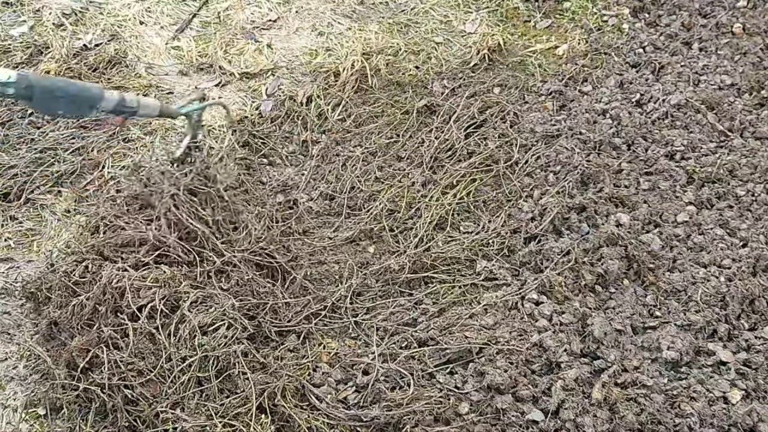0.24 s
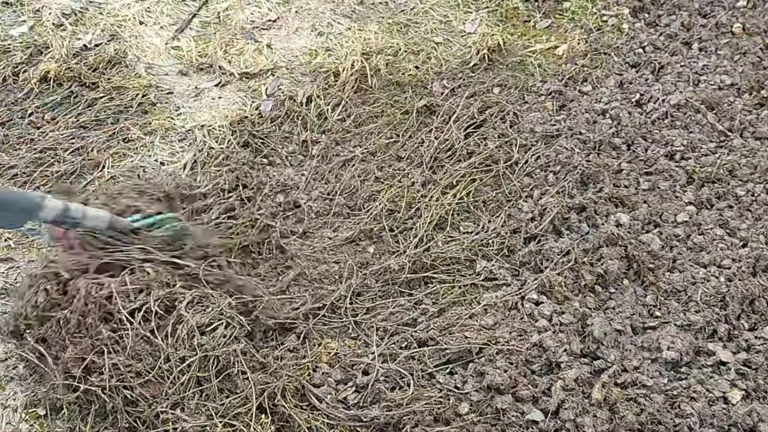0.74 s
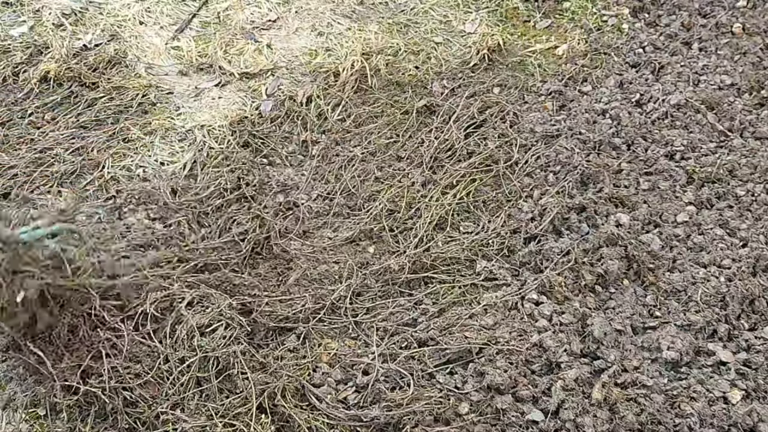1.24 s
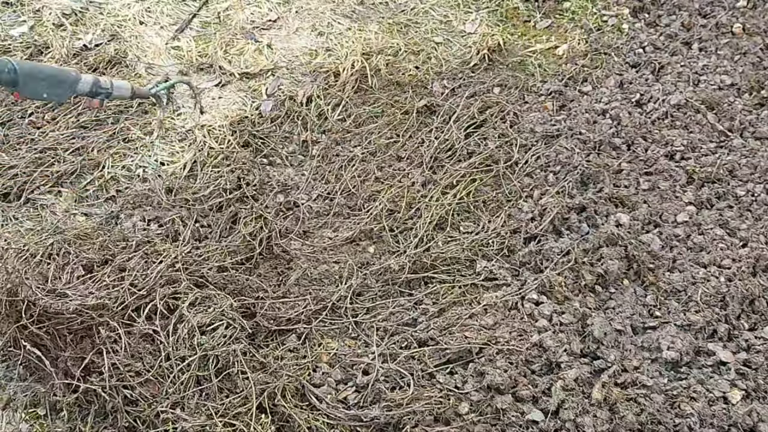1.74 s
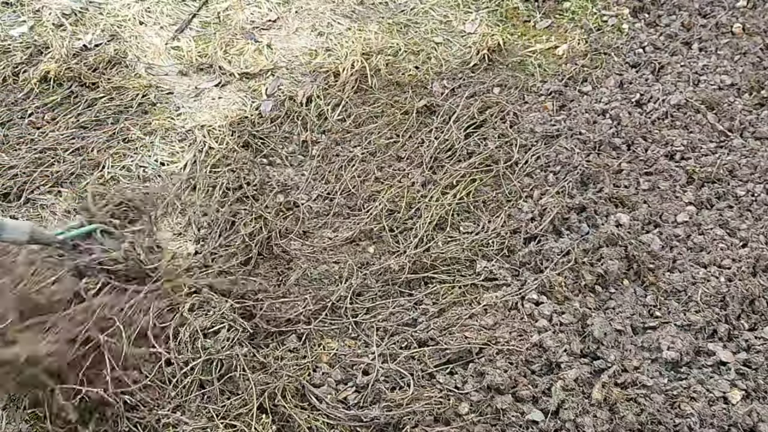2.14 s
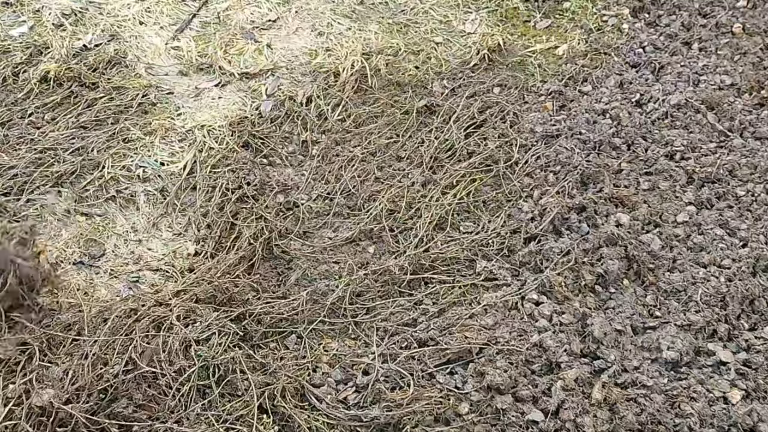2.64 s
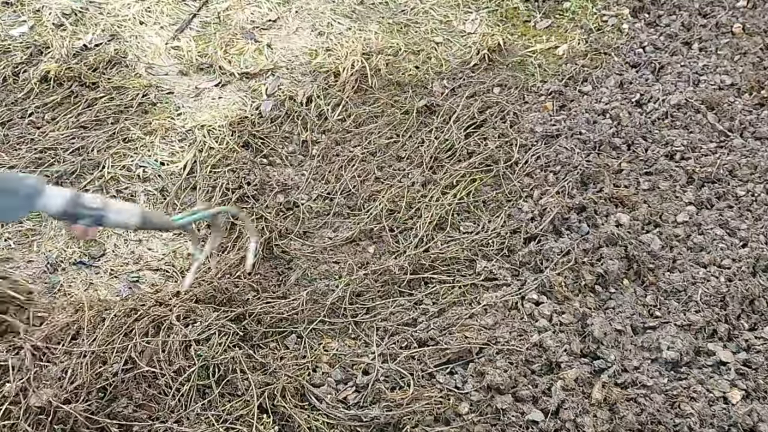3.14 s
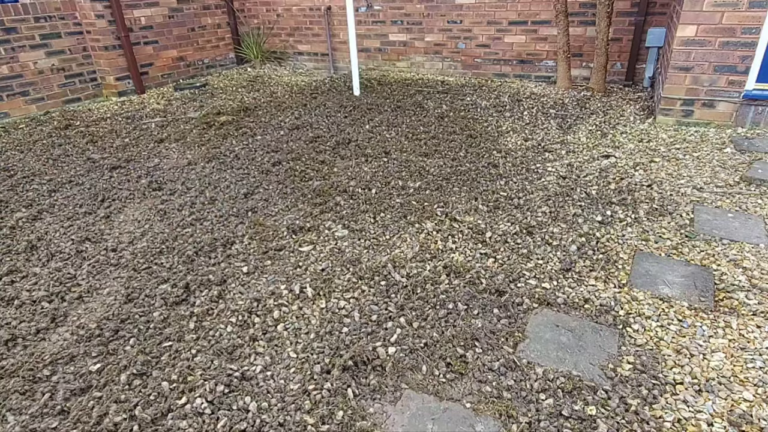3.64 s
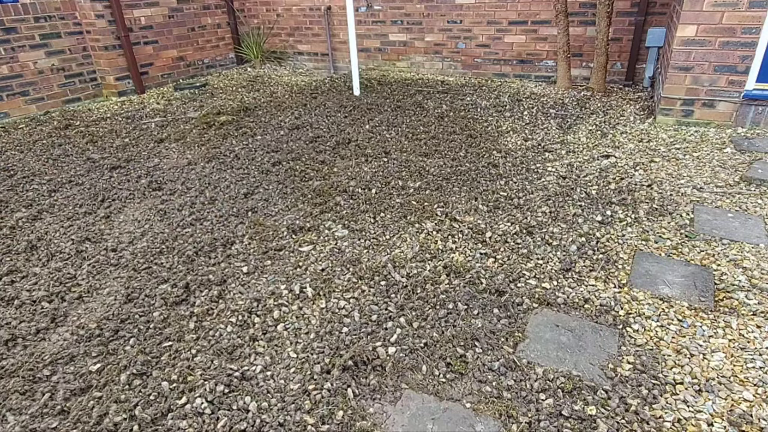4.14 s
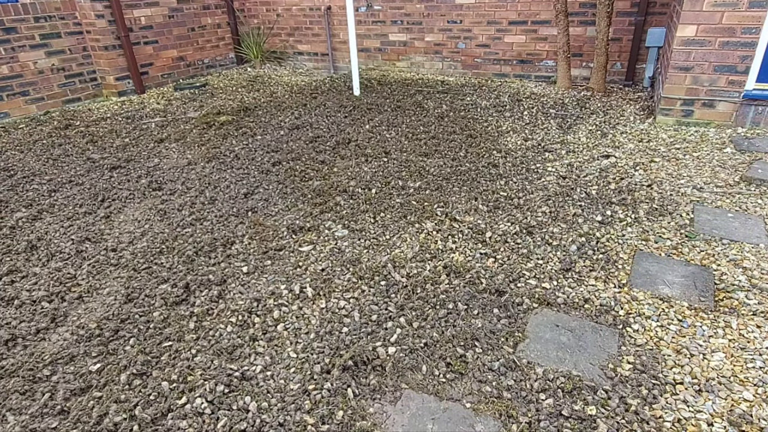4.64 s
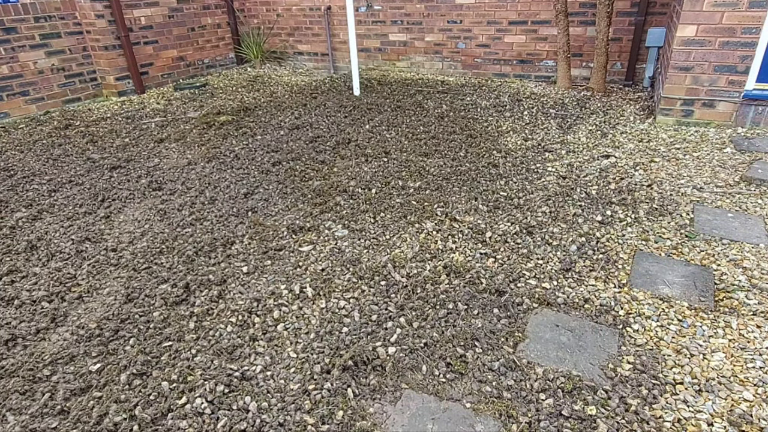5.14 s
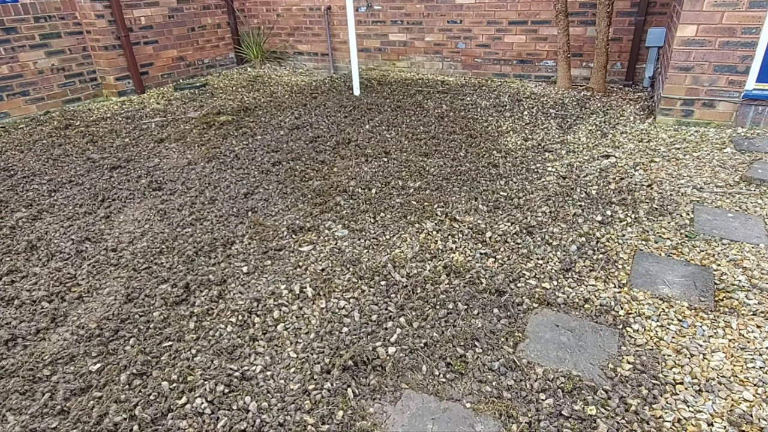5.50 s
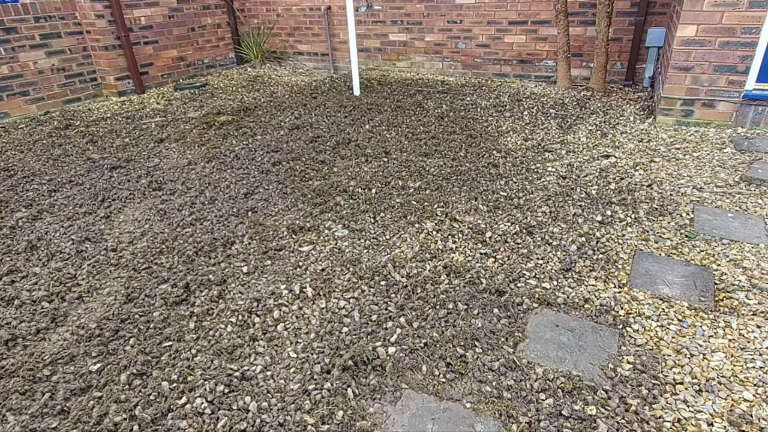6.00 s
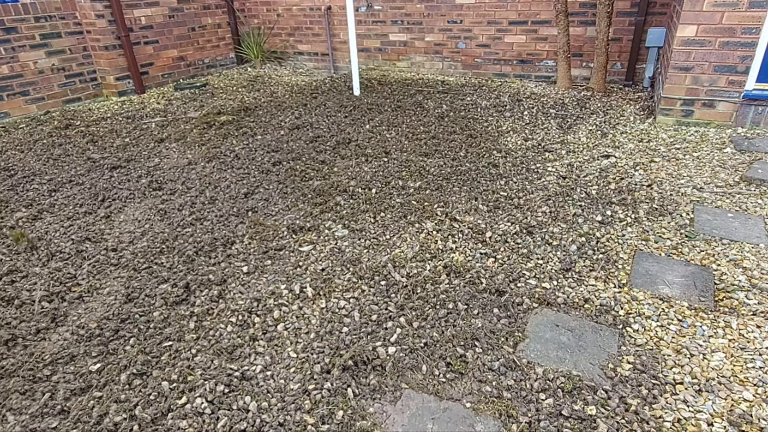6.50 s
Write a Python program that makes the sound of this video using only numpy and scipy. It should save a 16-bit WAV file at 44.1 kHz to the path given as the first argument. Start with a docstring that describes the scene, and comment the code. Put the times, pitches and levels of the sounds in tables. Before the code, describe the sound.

A garden with faint wind rumble on the microphone. Rake tines rip dry stalks, soft strokes between stronger ones, spread wide left and right. After a brief silence the sound turns close and nearly central: brushing straw, a hard metallic chatter, settling crumbs, knocking stones, heavy earth thumps, then rough gravel shoves with clicking pebbles.

```python
"""A light wind rumbles on the microphone while a garden rake combs dead grass over wet gravel.
After a moment of silence everything is very close: a swish of straw, a faint noise swelling just before
a sharp metal clack, knocks, clods of earth thudding down, and two long crunching scrapes through gravel.
Wind, straw, earth and gravel are coloured noise or random tiny clicks, shaped by each movement;
metal, stones and clods add fading tones, and thin rasps are narrow noise gliding in pitch."""
import sys
import numpy as np
from scipy import signal
from scipy.io import wavfile
from scipy.ndimage import uniform_filter1d, map_coordinates

SR = 44100
rng = np.random.default_rng(int(sys.argv[2]) if len(sys.argv) > 2 else 0)


def generate_wav(signal):
    """Clip the signal to [-1, 1] and save it as 16-bit WAV at the path in sys.argv[1]."""
    frames = np.transpose(np.atleast_2d(signal))
    scaled = np.clip(frames, -1, 1) * 32767
    pcm = np.round(scaled).astype(np.int16)
    wavfile.write(sys.argv[1], SR, pcm)


N = 298116
TIME = np.arange(N) / SR  # seconds

# Shoves through gravel. Each row: start in seconds, rise in seconds, hold in seconds,
# then the levels of stones, grit and fine fizz in dB.
GRAVEL_SHOVES = [(5.712, 0.056, .06, -47, -59, -59), (5.806, 0.024, .03, -48, -46.5, -46.5),
                 (5.846, 0.031, 0.039, -28, -34, -39.5), (5.932, 0.025, 0.087, -36, -43, -50),
                 (6.06, .05, 0.024, -68, -51.5, -55), (6.164, 0.068, 0.016, -62, -54, -60),
                 (6.237, .008, .02, -48.5, -40, -44.5), (6.261, .02, .022, -49.5, -34, -37.5),
                 (6.343, 0.024, 0.054, -44, -42, -34.5), (6.412, 0.024, 0.065, -31, -35.5, -39.5),
                 (6.511, 0.04, 0.054, -27, -29.5, -35.5), (6.631, 0.027, 0.044, -32, -33, -38.5),
                 (6.73, 0.029, .02, -33, -41, -47)]
# While a shove is held its force sags; once let go it falls by 60 dB in the second time.
GRAVEL_SAG_DB_PER_S, GRAVEL_T60_S = 31, 0.22


def amp(db):
    """Turns decibels into a gain."""
    return 10 ** (np.asarray(db) / 20)


def unit(x):
    """Scales a sound to an rms (average strength) of 1."""
    return x / np.sqrt(np.mean(x ** 2) + 1e-20)


def add(mix, s, sound):
    """Lays a sound into the mix, starting at s seconds."""
    part = mix[max(round(s * SR), 0):][:len(sound)]
    part += sound[:len(part)]


def colour(x, points, skirt_db=0):
    """Filters to a curve of (Hz, dB) points, without pre-echo; skirt_db is the fall per octave beyond the ends."""
    hz, db = np.transpose(points)
    octave = np.log2(abs(np.fft.fftfreq(4096, 1 / SR)) + 1)
    below = np.maximum(np.log2(hz[0]) - octave, 0)
    above = np.maximum(octave - np.log2(hz[-1]), 0)
    curve_db = np.interp(octave, np.log2(hz), db) - skirt_db * (below + above)
    log_gain = np.log(amp(np.maximum(curve_db, -100)))
    # The Hilbert transform supplies the phase that makes the filter respond as early as it can.
    taps = np.fft.ifft(np.exp(np.conj(signal.hilbert(log_gain)))).real
    return signal.oaconvolve(x, taps[:len(taps) // 2])[:len(x)]


def band(x, lo_hz, hi_hz, order=3):
    """Keeps only the pitches between two limits."""
    sos = signal.butter(order, [lo_hz, min(hi_hz, SR / 2 - 1)], "band", fs=SR, output="sos")
    return signal.sosfilt(sos, x)


def noise():
    """White noise drawn for an rms of 1."""
    return rng.standard_normal(N)


def flutter(depth_db, span_s):
    """A random gain that glides to a new value once in every span."""
    steps = rng.standard_normal(N)
    return amp(depth_db * np.interp(TIME / max(span_s, 1 / SR), np.arange(N), steps))


def swell(s, rise_s, hold_s, t60_s, sag_db_per_s=0):
    """Power of one movement: it builds up from time s, sags while it is held, then dies away."""
    age = TIME - s
    sag_db = sag_db_per_s * np.clip(age - rise_s, 0, hold_s)
    release_db = 60 * np.maximum(age - rise_s - hold_s, 0) / t60_s
    return (np.clip(age / rise_s, 0, 1) * amp(-sag_db - release_db)) ** 2


def grains(per_s, spread_db, smooth):
    """Tiny contacts of uneven size over a share of smooth friction noise."""
    size = amp(spread_db * np.minimum(rng.exponential(1, N), 4))
    clicks = size * rng.choice([-1, 1], N) * (rng.random(N) < per_s / SR)
    return unit(unit(clicks) + smooth * noise())


def patchy(x, depth_db, span_s=.035, octaves=.2):
    """Ever new contacts, each with its own resonances, make the colour wander."""
    hz, t, spectrum = signal.stft(x, SR, nperseg=512, noverlap=384)
    where = np.meshgrid(np.log2(hz + 1000) / octaves, t / span_s, indexing="ij")
    field = map_coordinates(rng.standard_normal((64, 512)), where, order=1, mode="wrap")
    return signal.istft(spectrum * amp(depth_db * field), SR, nperseg=512, noverlap=384)[1][:N]


def steady(x):
    """Evens out the slow swings of a texture, so that the force of the movement sets its loudness."""
    return x / np.sqrt(abs(uniform_filter1d(x ** 2, size=1300)) + 1e-20)


def ticks(rows, crack):
    """Short contacts: a few damped cycles of ring mixed with a gritty crack."""
    out, t = np.zeros(N), np.arange(SR // 20) / SR
    hisses = rng.standard_normal((len(rows), len(t)))
    for (s, db, hz, cycles), hiss in zip(rows, hisses):
        age = t * hz / cycles
        reach = max(1.29 + 0.78 / cycles ** 2, 1.1)  # the shorter the contact, the wider its band
        grit = unit(band(hiss, hz / reach, hz * reach, order=2))
        ring = np.sin(2 * np.pi * hz * t) + crack * grit
        tick = band(ring * (age * np.exp(-age)) ** 2, hz / reach / 2, hz * reach)
        add(out, s, amp(db) * tick / abs(tick).max())
    return out


def scrape(pushes, points, sag_db_per_s, t60_s, trickle_db, trickle_t60_s,
           stones_per_s, spread_db, smooth, flutter_db, patch_db):
    """Each push sets grains of three sizes colliding: stones speak low, grit higher, the finest crumbs fizz."""
    out, jolts = np.zeros(N), unit(flutter(flutter_db, span_s=0.0068))
    edges_hz = [100, 1600, 7500, 17000]
    # Stones take 1.33 times as long to die away as grit and fizz.
    for k, linger in enumerate([1.33, 1, 1]):
        power = 0
        for s, rise, hold, *sizes_db in pushes:
            push = swell(s, rise, hold, t60_s * linger, sag_db_per_s)
            trickle = swell(s, rise, hold, trickle_t60_s * linger, sag_db_per_s)
            power = power + amp(sizes_db[k]) ** 2 * (push + amp(trickle_db) ** 2 * trickle)
        # Finer grains are more numerous, up to one in every sample.
        crackle = colour(grains(stones_per_s * 4 ** k, spread_db, smooth), points, skirt_db=7.0)
        contacts = band(patchy(crackle, patch_db), edges_hz[k], edges_hz[k + 1], order=4)
        out += steady(contacts) * np.sqrt(power)
    return out * jolts


def ports(x, lag_s):
    """Sound from the left reaches the right port later."""
    return np.array([x, np.interp(TIME - lag_s, TIME, x)])


def scattered(x):
    """The same sound by ever changing paths off the ground: alike in colour, unrelated in phase."""
    return x * unit(band(noise(), 21, 90, order=2))


def widen(x):
    """Scatter gives the close sounds a little width."""
    # Each row: pitch in Hz, relative gain of the left-right difference in dB.
    width = [(60, -33.5), (110, -30.5), (200, -33.5), (380, -26.5), (700, -23), (1290, -29.5),
             (2380, -31.5), (4400, -34.5), (8120, -30.5), (15000, -21.5)]
    side = colour(scattered(x), width) * amp(-21.5)
    return np.array([x + side, x - side])


def garden():
    """Lumpy wind at each port is low noise that swells in gusts, over a soft noise wash of open air."""
    # Tone of the wind. Each row: pitch in Hz, gain in dB.
    wind_colour = [(13, -44.5), (22, -11), (64, 7), (110, -4.5), (156, -10), (274, -19), (347, -41),
                   (445, -22), (500, -29.5), (650, -48), (1100, -120)]
    # Tone of the open air. Each row: pitch in Hz, gain in dB.
    air_colour = [(250, -2), (450, -2.5), (800, -8), (1350, -18.5), (2100, -16.5), (3200, -24),
                  (4300, -17.5), (6870, -37.5), (9800, -43.5), (12400, -34), (15800, -37)]
    # Gusts. Each row: crest in seconds, half length in seconds, level in dB.
    gust_rows = [(0.0, 0.044, -46.5), (.41, 0.031, -46.5), (0.608, 0.092, -41.5), (1.07, 0.047, -50.5),
                 (1.283, 0.019, -46.5)]
    breeze_db, air_db = -54.5, -65

    def pair(points, apart):
        """Noise that differs between left and right by the share apart."""
        mid, side = (unit(colour(noise(), points, skirt_db=23.5)) for _ in range(2))
        return np.array([mid + apart * side, mid - apart * side])

    gusts = sum(amp(db) ** 2 * np.exp(-((TIME - s) / half) ** 2) for s, half, db in gust_rows)
    wind = pair(wind_colour, apart=0.34) * np.sqrt(amp(breeze_db) ** 2 + gusts)
    return wind + pair(air_colour, apart=.8) * amp(air_db)


def rake():
    """Each stroke tears a cloud of stalks, heard as dense tiny clicks; the heap keeps rustling in between."""
    # Tines biting into the grass. Each row: start in seconds, rise in seconds, relative level in dB,
    # time to fall by 60 dB in seconds, treble tilt in dB.
    strokes = [(0.0, 0.0016, -34.5, 0.18, -1), (0.713, 0.0024, -44.5, 0.089, -7),
               (0.983, 0.0082, -49, 0.078, -9.5), (1.329, 0.0065, -34, 0.31, 5.5),
               (1.346, 0.006, -34.5, 0.22, 8), (1.394, 0.0035, -40, 0.36, 2.5), (2.076, 0.018, -50, .2, 1),
               (2.099, 0.0045, -36.5, 0.21, 1), (2.145, 0.003, -39, 0.084, -5),
               (2.202, 0.0025, -55, 0.17, -15), (2.376, 0.0045, -42.5, 0.12, 3),
               (2.421, 0.0016, -46, 0.11, -4.5)]
    # The heap shifts as the rake lifts or drags it. Each row: start in seconds, hold in seconds,
    # relative level of the crunch in dB, relative level of the fine hiss in dB.
    shifts = [(0.0, 0.15, -58.5, -57), (0.378, 0.18, -69.5, -66), (0.708, 0.02, -56.5, -73),
              (1.496, 0.36, -75, -66), (1.688, 0.043, -58, -72), (1.993, .04, -67, -65.5),
              (2.11, 0.012, -58, -53.5), (2.58, 0.132, -71, -71.5)]
    # Single stalks snapping. Each row: start in seconds, relative peak in dB, pitch in Hz.
    snap_rows = [(.1266, -36, 7000), (.154, -41, 6500), (.1735, -36, 2050), (0.2245, -44, 1710),
                 (0.2745, -32, 6590), (0.3184, -40.5, 1500), (0.401, -48, 6100), (.5187, -43, 5400),
                 (.5387, -34.5, 7340), (0.6217, -41, 1990), (.9896, -39, 1510), (1.1064, -39.5, 890),
                 (1.3714, -18.5, 900), (1.399, -24, 1650), (1.716, -41, 1700), (1.7488, -37, 2100),
                 (2.1006, -41, 1710), (2.149, -31, 1400), (2.2064, -37, 1190), (2.382, -48, 5400),
                 (2.4235, -51, 1700)]
    # Tone of the straw. Each row: pitch in Hz, gain in dB.
    straw = [(150, -17), (250, -11.5), (450, -1.5), (650, -1), (1150, -5), (1740, -1.5), (2500, -5.5),
             (3500, -9), (4400, -10.5), (5700, -8), (7300, -10.5), (8800, -26), (13000, -21),
             (15800, -26.5)]
    # Tone of the fine hiss of dry stalks. Each row: pitch in Hz, gain in dB.
    dry_hiss = [(5000, 0), (7200, 1), (9500, -12.5), (12500, -1.5), (15800, -5)]

    # The heap never quite rests: its crunch and hiss start from a faint floor.
    low, fine = amp(-72) ** 2, amp(-89) ** 2
    for s, hold, crunch_db, hiss_db in shifts:
        power = swell(s, 0.024, hold, 0.29)
        low = low + power * amp(crunch_db) ** 2
        fine = fine + power * amp(hiss_db) ** 2
    high = low
    for s, rise, db, t60, tilt_db in strokes:
        power = amp(db) ** 2 * swell(s, rise, 0, t60)
        fine = fine + power * amp(-21.5) ** 2  # hiss relative to the stroke that tears the stalks
        low = low + power / amp(tilt_db)
        high = high + power * amp(tilt_db)
    jolts = flutter(depth_db=1.5, span_s=.008)

    def cloud():
        """The crackle of one patch of stalks."""
        stalks = colour(grains(per_s=2200, spread_db=1.5, smooth=0.41), straw, skirt_db=12)
        tearing = steady(patchy(stalks, depth_db=2.5))
        crunch = signal.sosfiltfilt(signal.butter(2, 2800, fs=SR, output="sos"), tearing)
        treble = tearing - crunch
        hiss = unit(colour(grains(per_s=870, spread_db=10.5, smooth=0.83), dry_hiss, skirt_db=15.0))
        return (crunch * np.sqrt(low) + treble * np.sqrt(high)) * jolts + hiss * np.sqrt(fine)

    snap_s = 0.00091  # sets the same short ring for every stalk
    snaps = ticks([(s, db, hz, hz * snap_s) for s, db, hz in snap_rows], crack=1.0)
    # The heap is wide: each port hears its own patch of stalks;
    # both share one more patch and the snaps, slightly later at the right.
    shared = ports(.5 * cloud() + amp(-4.0) * snaps, lag_s=0.000499)
    return shared + amp(-0.5) * np.array([cloud(), cloud()])


def rasps():
    """Friction noise in one narrow gliding resonance, swelling and fading with the slide."""
    # Something sliding with a thin rasp. Each row: start in seconds, length in seconds, level in dB,
    # middle pitch in Hz, width in Hz, glide in Hz per second.
    slides = [(0.831, .17, -73.5, 2400, 250, -800), (1.02, 0.17, -86, 4250, 500, 0),
              (3.087, 0.17, -68, 1250, 300, -1500), (3.088, .16, -67.5, 2700, 250, -500),
              (3.224, 0.053, -57.5, 2820, 705, -5000), (3.315, 0.047, -42.5, 1930, 400, -2000),
              (3.751, 0.2, -55, 2525, 500, 1501), (4.084, 0.044, -54, 1005, 600, -3000),
              (4.296, 0.2, -66, 934, 400, -2000), (4.44, 0.054, -37, 1850, 794, 0),
              (4.48, 0.038, -37, 1376, 930, 4), (4.556, .06, -46, 2450, 500, 3000),
              (4.592, .08, -41, 2930, 640, 2000), (4.697, .07, -46.5, 2530, 500, -4000),
              (5.161, .066, -34, 3270, 1100, 3000), (5.168, 0.071, -44.5, 6080, 1600, 2),
              (6.085, 0.081, -44.5, 3000, 600, 1998), (6.348, .06, -37, 4490, 1200, 0)]
    out = np.zeros(N)
    for s, length, db, hz, width, glide in slides:
        t = np.arange(int(length * SR)) / SR
        smooth = signal.butter(2, width / 2, fs=SR, output="sos")
        # Two slow noises steer a gliding tone, which spreads it into a narrow band.
        a, b = unit(signal.sosfilt(smooth, rng.standard_normal((2, SR // 2))))[:, -len(t):]
        turn = 2 * np.pi * np.cumsum(hz + glide * (t - length / 2)) / SR
        rasp = a * np.cos(turn) + b * np.sin(turn)
        add(out, s, amp(db) * rasp * np.sin(np.pi * t / length))
    return out


def swish():
    """Brushes through straw, and last a faint noise swelling just before the clack, all of dense tiny grains."""
    # Brushes, then in the last row the faint swell. Each row: start in seconds, rise in seconds,
    # hold in seconds, then the levels of coarse, middle and fine grains in dB.
    swells = [(3.088, .006, 0.16, -69.5, -64.5, -71.5), (3.21, 0.037, .022, -66.5, -50, -51.5),
              (3.284, 0.0047, 0.013, -62, -45, -54), (3.312, 0.0028, .003, -45.5, -31.5, -44.5),
              (3.322, 0.0026, 0.0018, -44, -27, -38.5), (3.338, 0.0037, .003, -40.5, -35.5, -42),
              (3.42, 0.037, .22, -79.5, -85.5, -86), (3.665, .07, 0.003, -64, -73, -80)]
    # Tone of these sounds. Each row: pitch in Hz, gain in dB.
    swish_colour = [(400, -34), (680, -30), (900, -2.5), (1330, -17.5), (1890, -8), (3000, 0.5), (4500, -3),
                    (8000, -12.5), (12500, -13.5), (15800, -32.5)]
    return scrape(swells, swish_colour, sag_db_per_s=9.5, t60_s=0.0771, trickle_db=-32.5, trickle_t60_s=0.5,
                  stones_per_s=4000, spread_db=4, smooth=0.24, flutter_db=0.5, patch_db=1.5)


def rumble():
    """A faint low rumble, made of deep noise, comes with each bout of work."""
    # Each row: start in seconds, rise in seconds, hold in seconds, level in dB.
    bouts = [(3.09, .1, .1, -73.5), (3.221, .15, 0.06, -54.5), (3.734, 0.02, 0.0074, -51),
             (4.05, .06, 0.018, -69), (4.443, 0.035, 0.99, -56.5), (5.76, 0.17, 0.16, -53.5),
             (6.218, 0.12, 0.44, -58.5)]
    power = sum(amp(db) ** 2 * swell(s, rise, hold, t60_s=0.65) for s, rise, hold, db in bouts)
    return steady(band(noise(), 45, 110, order=2)) * np.sqrt(power)


def clack():
    """The metal chatters on a stone: each contact is a crack and a short bright ring."""
    # Each row: start in seconds, peak in dB.
    contacts = [(3.7383, -23.5), (3.7396, -21.5), (3.7425, -5), (3.7437, -14), (3.7482, -13.5),
                (3.752, -14.5)]
    # The tones the metal rings with. Each row: pitch in Hz, relative level in dB,
    # time to fall by 60 dB in seconds.
    metal = [(822, -28, 0.055), (2040, -18.5, 0.012), (2874, -9, 0.012), (3467, -20, 0.019),
             (4330, -20.5, 0.016), (6140, -23, 0.02), (8730, -1, 0.0091), (9070, -1.5, 0.011),
             (12070, -22, 0.013), (13440, -12.5, 0.0033)]
    out, t = np.zeros(N), np.arange(SR // 10) / SR
    for s, db in contacts:
        ring = sum(amp(d - 60 * t / t60) * np.sin(2 * np.pi * hz * (t + s)) for hz, d, t60 in metal)
        crack = amp(-7.0 - 60 * t / .022) * band(rng.standard_normal(len(t)), 1100, 11000, order=1)
        contact = (ring + crack) * (1 - np.exp(-t / 0.00018))  # softens the very first instant
        add(out, s, amp(db) * contact / abs(contact).max())
    return out


def settling():
    """Loose crumbs settle: soft friction noise with a long thin trickle after each push."""
    # Each row: start in seconds, rise in seconds, hold in seconds,
    # then the levels of stones, grit and fine fizz in dB.
    trickles = [(3.752, 0.0032, .008, -46.5, -49, -56.5), (3.77, 0.009, .125, -67, -56, -67),
                (4.026, 0.0035, 0.13, -61.5, -62.5, -72), (4.18, 0.011, 0.044, -66, -74, -78),
                (4.28, 0.072, 0.11, -71.5, -86, -98), (4.455, 0.012, 0.048, -38.5, -49.5, -65)]
    # Tone of the crumbs. Each row: pitch in Hz, gain in dB.
    settling_colour = [(200, -6.5), (450, 2.5), (700, -3.5), (1100, 2.5), (1900, -3.5), (2700, -5),
                       (4800, -13.5), (6400, -12.5), (8000, -24), (11500, -29.5), (15800, -39)]
    return scrape(trickles, settling_colour, sag_db_per_s=46, t60_s=0.27, trickle_db=-24, trickle_t60_s=3.4,
                  stones_per_s=1500, spread_db=3.0, smooth=1.0, flutter_db=2.0, patch_db=6.0)


def knocks():
    """Stones knock together: each hit is a brief damped tone with a little grit."""
    # Each row: start in seconds, peak in dB, pitch in Hz, length of the ring in cycles.
    hits = [(3.905, -36.5, 2800, 2.2), (4.4385, -35, 1750, 1.6), (4.4542, -12, 1790, 1.4),
            (4.4548, -24, 855, 1.6), (4.4565, -18, 1880, 1.4), (4.4621, -18, 1880, 1.9),
            (4.4705, -19, 1820, 0.98), (5.0645, -17.5, 1118, 3.5), (5.0675, -19, 618, 1),
            (5.113, -22, 1120, 2), (5.222, -20.5, 660, 1.9), (5.2555, -21, 970, 0.71),
            (5.377, -30, 1500, 0.35), (5.731, -39.5, 660, 1), (5.7588, -33, 657, 0.87),
            (5.794, -27.5, 645, 1.1), (5.812, -29, 530, 1.1), (5.833, -35, 600, 1.1), (5.8712, -15, 770, 1),
            (5.8768, -13.5, 760, 0.7), (5.884, -16, 690, 2.7), (5.8964, -13.5, 724, 1.3),
            (5.9178, -25, 1100, 0.54), (6.0728, -26, 720, 0.37), (6.3335, -30.5, 890, 1.4),
            (6.4208, -12, 880, 0.67), (6.447, -21, 1050, 2.8), (6.4995, -21, 625, 0.49),
            (6.4745, -12, 935, 0.52), (6.5955, -19.5, 885, 4.7), (6.614, -12, 770, 0.33),
            (6.6515, -17.5, 740, 0.34), (6.657, -17.5, 590, 0.37), (6.7295, -17.5, 950, 0.76),
            (6.754, -20, 1100, 1.2)]
    return ticks(hits, crack=0.16)


def earth():
    """Earth spills: a dull crumbling of many contacts, mostly low in pitch."""
    # Each row: start in seconds, rise in seconds, hold in seconds,
    # then the levels of stones, grit and fine fizz in dB.
    spills = [(4.526, 0.024, 0.041, -38, -58, -69.5), (4.598, .022, 0.036, -44.5, -53, -55),
              (4.728, 0.016, 0.031, -57.5, -70, -60.5), (4.797, 0.013, 0.02, -27.5, -38, -44.5),
              (4.824, 0.0067, 0.003, -38, -35, -41), (4.91, 0.019, .08, -51.5, -75.5, -90),
              (5.062, 0.0066, 0.02, -21.5, -44.5, -65), (5.083, 0.015, 0.052, -30, -39.5, -50.5),
              (5.168, 0.02, 0.058, -33, -38.5, -51.5), (5.25, 0.023, 0.13, -38.5, -46.5, -56.5),
              (5.41, 0.053, .012, -40, -51, -65.5), (5.52, 0.055, .16, -79.5, -64.5, -78)]
    # Tone of the earth. Each row: pitch in Hz, gain in dB.
    earth_colour = [(120, -29.5), (200, -16.5), (254, -8.5), (372, -7), (517, -7.5), (668, -2.5),
                    (760, -9.5), (1100, -10.5), (1340, -17), (2230, -29), (3050, -29), (7070, -41.5),
                    (10000, -46.5), (11600, -43.5), (15800, -61)]
    return scrape(spills, earth_colour, sag_db_per_s=54.5, t60_s=0.15, trickle_db=-36.5, trickle_t60_s=1.5,
                  stones_per_s=1500, spread_db=3.0, smooth=0.64, flutter_db=1.0, patch_db=4.0)


def thuds():
    """A clod lands with a wavering boom and a dull churn of loose earth."""
    # Each row: start in seconds, rise in seconds, hold in seconds, level of the boom in dB, pitch in Hz,
    # time to fall by 60 dB in seconds, loose earth relative to the boom in dB.
    clods = [(4.527, 0.015, 0.036, -37, 179, 0.35, 2.5), (4.57, 0.028, 0.031, -29, 190.6, 0.19, -6),
             (4.808, 0.022, 0.038, -20, 65, 0.23, -6), (5.063, 0.0068, 0.06, -13, 75.8, 0.37, -3),
             (5.14, 0.014, 0.013, -26, 213, 0.38, -6), (5.25, 0.0053, 0.01, -28, 69.7, 0.22, -12)]
    # Tone of the churn. Each row: pitch in Hz, gain in dB.
    thud_colour = [(30, -24.5), (60, -8), (110, 3), (220, -0.5), (300, -4), (450, -10.5), (700, -29.5)]
    out = np.zeros(N)
    for s, rise, hold, db, hz, t60, loose_db in clods:
        age = np.maximum(TIME - s, 0)
        fall_db = 60 * np.maximum(age - rise - hold, 0) / t60
        push = np.minimum(age / rise, 1) * amp(db - fall_db)
        wavering_time = np.cumsum((age > 0) * flutter(depth_db=1.1, span_s=0.014)) / SR
        boom = np.sqrt(2) * np.sin(2 * np.pi * hz * wavering_time)
        churn = steady(colour(noise(), thud_colour, skirt_db=33.5))
        out += push * (boom + amp(loose_db) * churn)
    return out


def gravel():
    """Shoves through gravel: sparser contacts among the stones, denser ones in the grit and fizz."""
    # Tone of the gravel. Each row: pitch in Hz, gain in dB.
    gravel_colour = [(71, -46), (120, -37), (289, -3.5), (511, -6.5), (602, 1.5), (754, -8.5), (888, -3),
                     (1390, -7), (1600, -13), (2220, -11.5), (5040, -20.5), (6300, -20), (6980, -27.5),
                     (13100, -28), (15800, -39)]
    # The negative trickle time makes the faint trickle grow after a shove instead of fading.
    return scrape(GRAVEL_SHOVES, gravel_colour, GRAVEL_SAG_DB_PER_S, GRAVEL_T60_S,
                  trickle_db=-36.5, trickle_t60_s=-6,
                  stones_per_s=400, spread_db=1.0, smooth=0.78, flutter_db=0.86, patch_db=4)


def pebbles():
    """Larger pebbles click together at random while the gravel is shoved, each click a short ring."""
    # Tones of the pebbles. Each row: pitch in Hz, relative level in dB, time to fall by 60 dB in seconds.
    pebble_rings = [(615, -2, .05), (914, -2.5, 0.067), (1384, -6, 0.058), (2180, -10.5, .018),
                    (3240, -10, 0.011)]
    power = sum(amp(db) ** 2 * swell(s, rise, hold, GRAVEL_T60_S, GRAVEL_SAG_DB_PER_S)
                for s, rise, hold, db, *_ in GRAVEL_SHOVES)
    force = np.sqrt(power)
    out, t = np.zeros(N), np.arange(SR // 10) / SR
    for hz, db, ring_s in pebble_rings:
        ring = amp(-60 * t / ring_s) * np.sin(2 * np.pi * hz * t)
        clicks = grains(per_s=35, spread_db=3.0, smooth=0) * force
        out += amp(db) * signal.oaconvolve(clicks, ring / np.linalg.norm(ring))[:N]
    return amp(-4.5) * out  # relative to the stones of the shove


def scene():
    """The raking in the open garden, a silence, then the close work."""
    pause_s = 2.745
    fade = amp(-1500 * np.clip(TIME - pause_s, 0, .06))  # down by 90 dB within 0.06 s
    outdoors = (garden() + rake()) * fade
    loose = swish() + settling() + earth() + gravel() + pebbles()
    close = loose + rasps() + rumble() + clack() + knocks() + thuds()
    return outdoors + widen(close)


def record(dry):
    """Removes everything above about 15900 Hz."""
    taps = signal.firwin(511, 15900, window=("kaiser", 9), fs=SR)
    return signal.oaconvolve(dry, taps[None], "same")


dry = scene()
out = record(dry)
generate_wav(out)
```